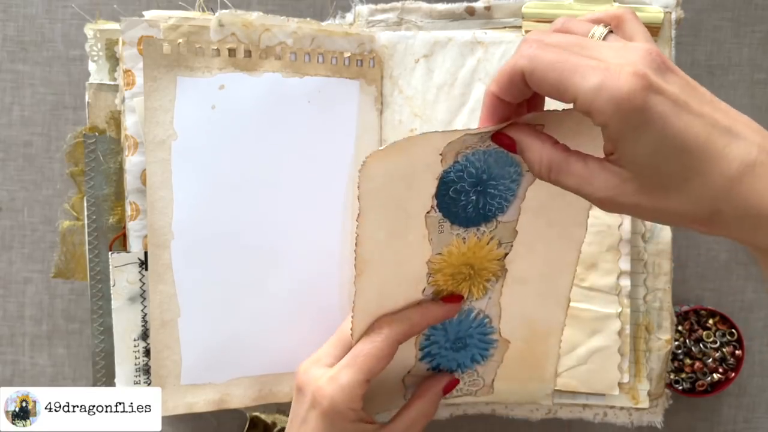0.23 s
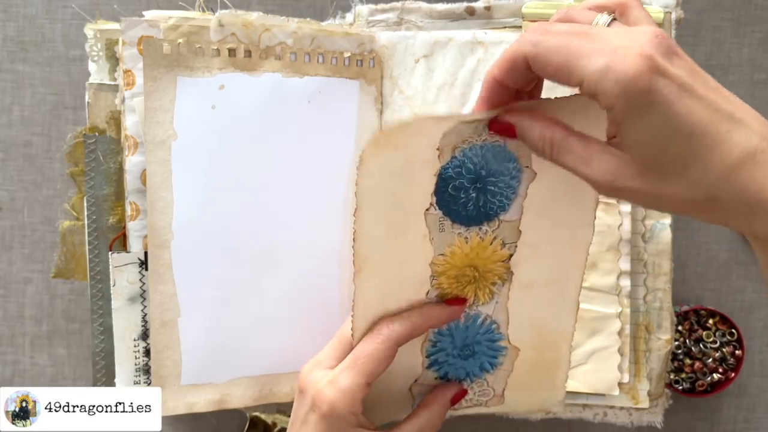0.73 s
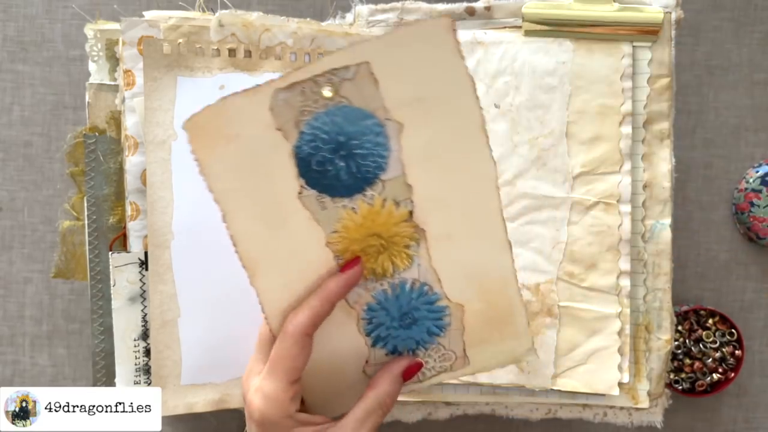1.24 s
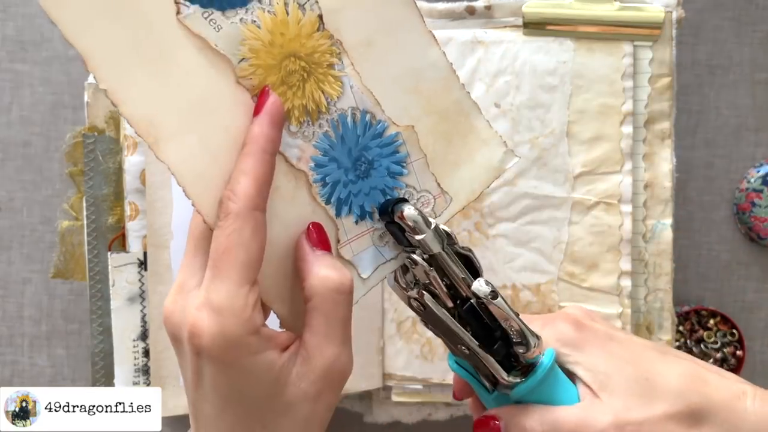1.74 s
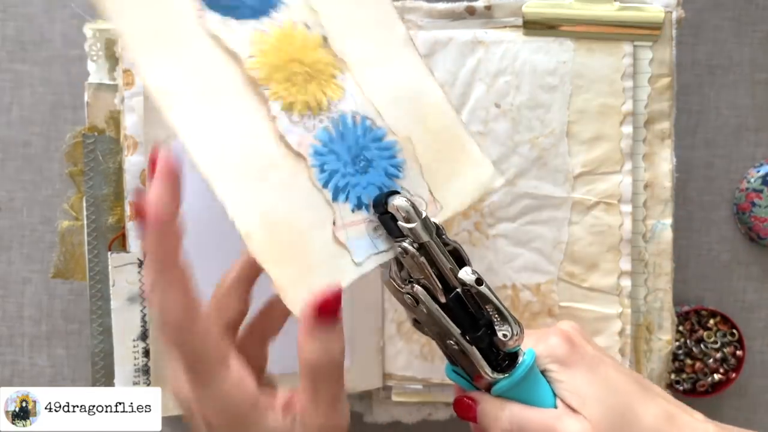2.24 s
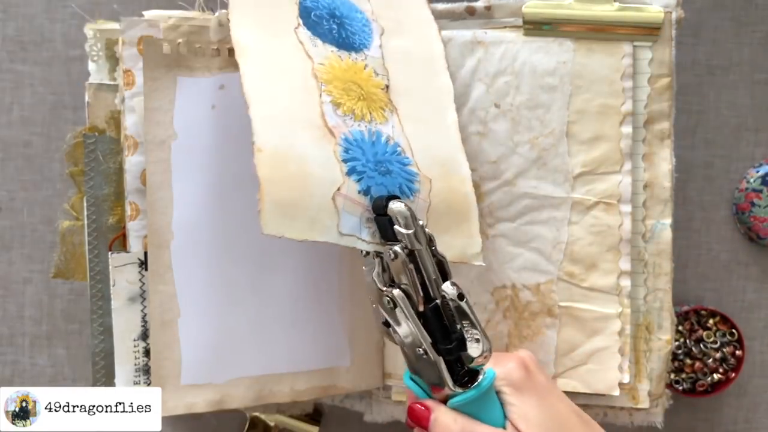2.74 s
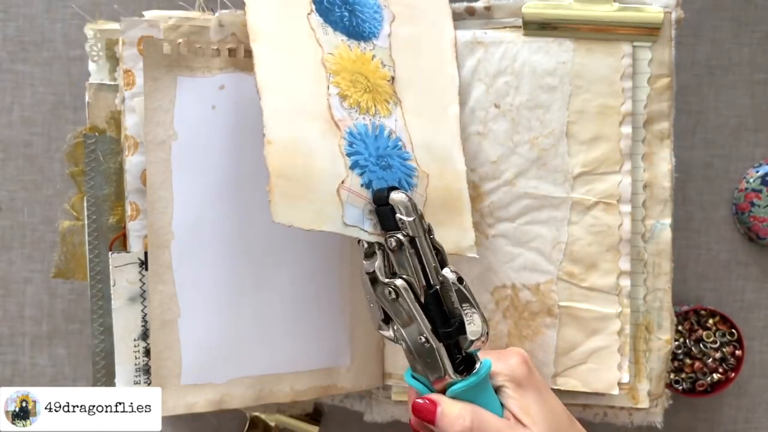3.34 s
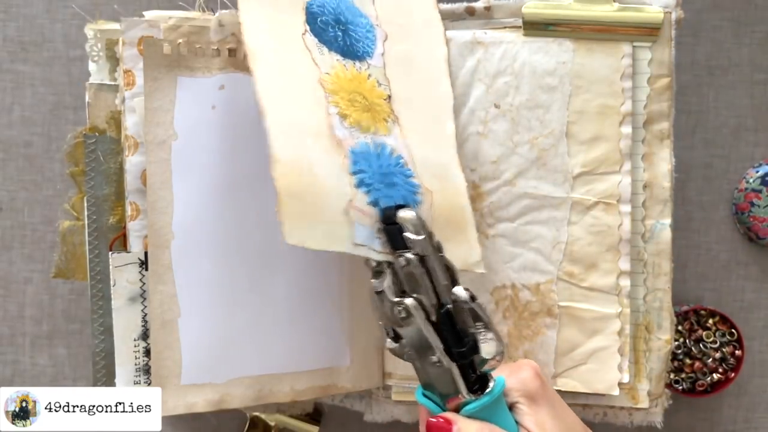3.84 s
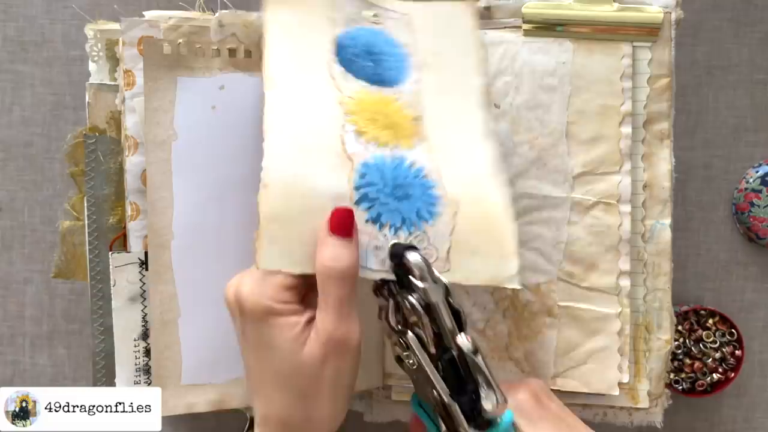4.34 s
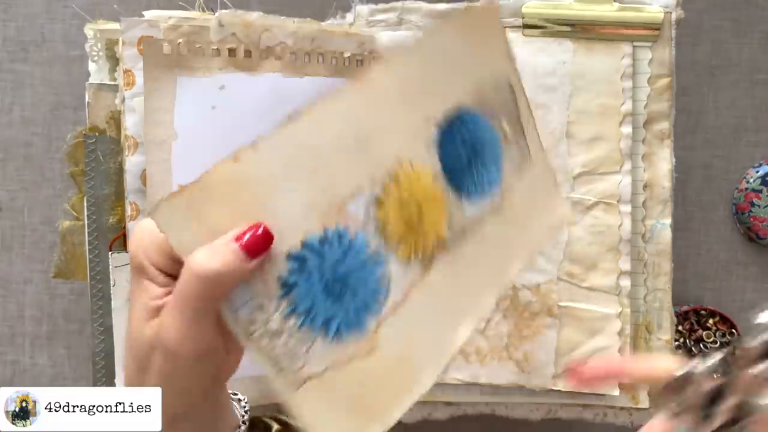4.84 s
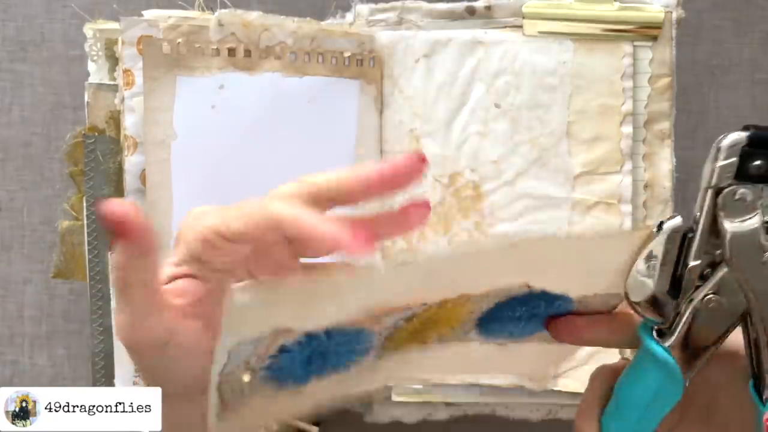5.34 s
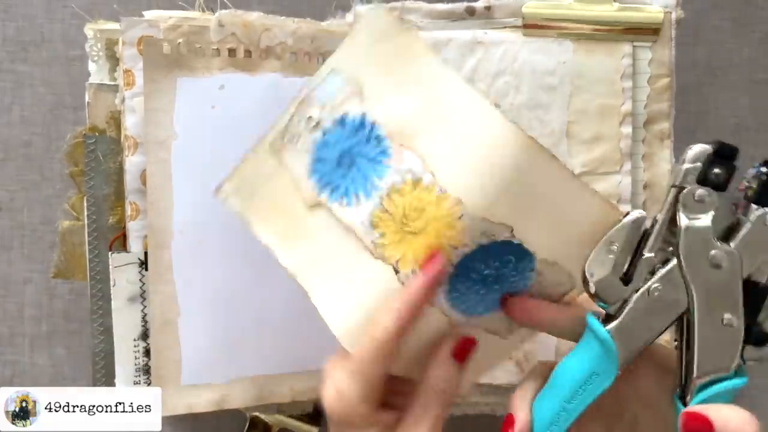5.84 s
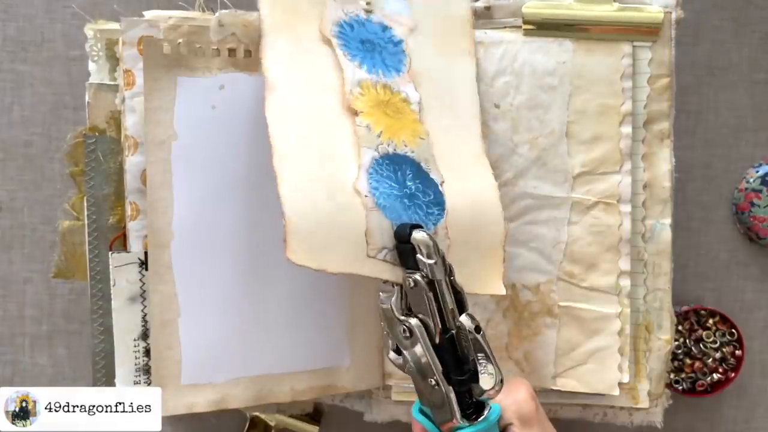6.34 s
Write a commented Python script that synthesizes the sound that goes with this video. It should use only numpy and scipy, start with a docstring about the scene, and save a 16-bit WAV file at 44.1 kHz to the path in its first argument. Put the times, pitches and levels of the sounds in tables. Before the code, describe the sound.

A quiet, fairly dry indoor room with very faint steady hiss and a wavering low rumble; everything is close, in stereo. From 0 to 0.8 s stiff paper rubs softly and buckles with dull, hollow pops around 0.26, 0.36 and 0.7 s. It nearly quiets, with one muted flex at 1.35 s. From 1.9 to 2.45 s come crisp crackles and light scraping, then faint rubbing. Pliers tick lightly at 2.95 s, clack firmly at 3.2 s with a short low ring, tick again from 3.5 to 3.75 s, and crimp with a hard snap at 3.86 s. Around 4.2 to 4.38 s they spring open, the loudest clack, mixed with sharp paper snaps and a burst of rustle. Rubbing and small crackles continue. Dense paper snaps peak at 5.25 to 5.35 s and again at 5.75 to 5.95 s, leaving brief papery resonance. The sound thins out to a small brush and flick near 6.59 s.

```python
"""Under the whole scene in a quiet room lie a steady hiss (shaped noise) and a wavering low rumble (a resonance).
A stiff paper sheet is first rubbed and buckled close to a two-port microphone: noise strokes and ringing snaps.
Then steel hand pliers close on it with a few clicks, crimp, and spring open: noisy pushes ring the tool.
Harder snaps and rubbing of the sheet follow and thin out; narrow-band hums of pliers and sheet follow some blows."""
import sys
import numpy as np
from scipy import signal
from scipy.fft import rfft, irfft, next_fast_len
from scipy.io import wavfile
from scipy.ndimage import uniform_filter1d, map_coordinates

SR = 44100
rng = np.random.default_rng(int(sys.argv[2]) if len(sys.argv) > 2 else 0)


def wav_out(sig):
    """Save sig, one row per channel (or a flat mono array), as 16-bit PCM at SR to the path in sys.argv[1]."""
    wavfile.write(sys.argv[1], SR, np.round(np.clip(np.atleast_2d(sig).T, -1, 1) * 32767).astype(np.int16))


N = 291362

# Spectrum of the steady hiss. Each row: frequency in Hz, relative density in dB per Hz.
HISS_SPECTRUM = [(80, -18), (120, -13), (250, -14), (500, -20), (1000, -21), (4000, -33), (12000, -31)]
HISS_DB = -68
# Course of the low rumble. Each row: time in seconds, level in dB.
RUMBLE_LEVEL = [(0.0, -65), (0.27, -61.5), (0.42, -71), (1.67, -65), (1.78, -71.5), (2.28, -55),
                (2.54, -66), (3.85, -63.5), (4.06, -55.5), (4.21, -62), (4.42, -50), (4.75, -77),
                (5.19, -77), (5.34, -63), (5.65, -73), (5.8, -58.5), (6.61, -79)]

# Phase between the ports. Each row: frequency in Hz, lead of the left port in radians.
PORT_LEAD = [(0, 0), (2000, .2), (2600, 1.4), (3500, 1.3), (4100, .6), (5500, .2), (7200, 1.3), (8500, 0),
             (10250, -3.14), (12000, -6.3), (13750, -9.4), (16000, -13.5)]
# Strength between the ports. Each row: frequency in Hz, left minus right in dB.
PORT_BALANCE = [(60, 1.5), (200, 0.7), (700, 1.3), (1400, -0.5), (3000, 3), (6000, 2), (10000, -0.1)]
# Decay of the room. Each row: frequency in Hz, time to fall by 60 dB in seconds.
WALL_DECAY = [(200, 0.21), (1500, 0.14), (10000, 0.15)]
# Part of the echoes with opposite sign at the ports. Each row: frequency in Hz, gain in dB.
ECHO_SCATTER = [(200, -18.5), (700, -14.5), (2500, -15.5), (5500, -5), (10000, -21)]
# Response of the microphone. Each row: frequency in Hz, gain in dB.
MICROPHONE_RESPONSE = [(100, -0.5), (12500, -2.5), (13300, -3.5), (16000, -9)]
TOP_HZ = 16300  # band limit of the microphone
SOFT_TOP_HZ = 13000  # the hiss and the rubbing are kept below this frequency

# Arrival delays of flap, crack and tick in seconds: bending waves are slower at low pitch.
ARRIVAL_LAG_S = [.001, .0005, 0]
# Contacts in the pliers, which ring jaws and handles. Each row: start in seconds, crack level in dB
# before a common gain, knock and tick in dB over the crack, knock and crack pitch in Hz.
PLIER_CLICKS = [(2.9406, -44.5, -32, -7, 1320, 2950), (2.9532, -38, -22, -3, 1070, 2960),
                (3.1997, -23, 4, 1, 659, 2200), (3.2042, -20, -1.5, -6.5, 590, 2730),
                (3.3966, -51, -23, 9.5, 595, 2370), (3.5051, -32, -1, 3, 846, 3160),
                (3.5983, -33, 0.5, 5, 1640, 3030), (3.7206, -59, -8, 14, 570, 3060),
                (3.753, -43, -0.5, 26.5, 1220, 4830), (3.777, -50, -2, -4.5, 620, 2620),
                (3.8471, -35.5, -13, 11, 1330, 2640), (3.8554, -16.5, -8.5, 3, 1450, 2900),
                (4.2187, -39.5, 3, -11.5, 1070, 2720), (4.2413, -27.5, 0, 7, 1490, 2340),
                (4.3019, -14, -2, -1, 930, 3180)]
# Resonances of the jaws, damped by the hand. Each row: centre in Hz, width in Hz, relative level in dB.
JAW_MODES = [(5860, 1800, -4.5), (8400, 1770, 0), (10870, 1740, 2), (14800, 1500, -13.5)]
# Resonances of the tool after a blow. Each row: centre in Hz, width in Hz, relative level in dB.
HANDLE_MODES = [(312.6, 45, -3), (610, 190, -0.5), (1430, 75, -7.5), (2900, 350, 1)]

# Lingering hums of pliers and sheet after some blows. Each row: start in seconds, hold in seconds,
# fall in seconds (by 20 dB), level in dB, pitch in Hz.
LINGERING_HUMS = [(3.216, 0.08, 0.07, -50, 309), (3.87, 0.038, 0.076, -51, 1380),
                  (5.296, 0.039, 0.081, -45, 883), (5.957, 0.024, 0.18, -58, 880)]
# Broad resonances of the sheet in four ranges: thud, flutter, scrape, hiss.
# Each row within a range: centre in Hz, width in Hz, relative level in dB.
SHEET_MODES = [
    [(102.8, 57, 0.5), (221, 84, 1.5), (342, 180, 0)],
    [(446, 270, -1.5), (867, 295, 3.5), (1277, 1040, -1)],
    [(1940, 1840, 0.5), (2970, 1190, 6.5), (4410, 3370, -0.5)],
    [(6300, 3120, -4), (9050, 2410, 0), (11020, 1540, 0)],
]
# Buckles of the sheet. Each row: start in seconds, crack level in dB before a common gain,
# flap and tick in dB over the crack, flap and crack pitch in Hz.
BUCKLES = [(0.0966, -48, 10, -23, 1000, 1860), (0.2615, -28, 0, -24, 870, 1650),
           (0.3082, -58, 16, -19, 970, 1670), (0.3566, -24.5, -4.5, -14.5, 1000, 1710),
           (0.442, -45, 0, 9, 764, 2440), (0.474, -57, 10.5, 9, 1040, 1580),
           (0.7001, -28, 0, -33, 1040, 1610), (1.3515, -38, -7, -11, 420, 1530),
           (1.8582, -54, -12, -21, 325, 3020), (1.9361, -37.5, -10, 3, 974, 1500),
           (1.9445, -33, -3, -3, 860, 4150), (1.954, -34, -1.5, 5.5, 910, 3200),
           (1.964, -44, 1, -13.5, 400, 1610), (2.13, -48, 3, -8, 410, 3950),
           (2.1852, -42.5, -3, -3, 315, 4500), (2.227, -43.5, 7.5, -10, 910, 3990),
           (2.2414, -35, 1, 0.5, 390, 2660), (2.3127, -31.5, 5, -17, 970, 2720),
           (2.3493, -31, -3, -21, 974, 3000), (2.3577, -34, -4, -8, 364, 3120),
           (2.378, -32, 7, 7.5, 1020, 4180), (2.4151, -43, 2, 20, 1020, 4240),
           (2.4564, -44, -20, -2, 904, 3700), (2.626, -47.5, -35, -16, 398, 3560),
           (4.1168, -45.5, 11, 4, 1040, 1440), (4.3105, -24.5, -24, 3, 1020, 3520),
           (4.3202, -15.5, -13, -1.5, 466, 3240), (4.335, -37, 5, 17, 1070, 2140),
           (4.3524, -22.5, -11, -17, 885, 2800), (4.3774, -29.5, -26.5, -1, 980, 2800),
           (4.4958, -41.5, 2, 6, 470, 4440), (4.5684, -33, -0.5, 4.5, 860, 3430),
           (4.6771, -34, -7.5, -19.5, 1020, 4000), (4.922, -39.5, 4, -9, 815, 1770),
           (5.0924, -48, -13, -27.5, 975, 2820), (5.157, -54.5, -3, -12, 890, 2713),
           (5.2535, -30.5, -3.5, 1, 1040, 3900), (5.2795, -19, -9.5, -7.5, 1500, 2620),
           (5.2916, -29, -3.5, -14.5, 820, 1880), (5.305, -25.5, -11, 4, 855, 3240),
           (5.3166, -36.5, 4, 0, 880, 2600), (5.3309, -25, -6, -13, 920, 2160),
           (5.346, -41.5, 9.5, -8, 880, 2050), (5.3658, -50.5, 14, -14, 870, 2210),
           (5.503, -39, -7, 11.5, 1520, 3400), (5.514, -27, -6, -36, 884, 2060),
           (5.5944, -29.5, -10, -23, 690, 2140), (5.6019, -38.5, 8.5, 5.5, 870, 1740),
           (5.6557, -48.5, 1, -22, 1210, 2230), (5.7629, -26.5, -2, -7, 1180, 2620),
           (5.7987, -25, -0.5, -33, 1360, 2660), (5.8075, -29, 4.5, -17.5, 835, 2330),
           (5.8137, -25.5, -9.5, -22, 790, 3800), (5.8307, -35, 0, -18, 970, 2190),
           (5.877, -26, -12.5, 3.5, 776, 4850), (5.9317, -40.5, 5.5, 11, 940, 2180),
           (5.9497, -37, 4.5, -22, 940, 1490), (6.59, -39, -13, 1, 1450, 2920)]
# Strokes of fingers and sheet. Each row: start of the hold, hold, rise and fall in seconds (rise and fall
# span 20 dB), scrape level in dB, flutter and hiss in dB over the scrape.
RUB_STROKES = [(0.0, 0.0085, .05, 0.29, -48.5, -4.5, -3.5), (0.154, 0.016, 0.032, 0.085, -59.5, 6, 1),
               (0.35, 0.0091, 0.052, 0.11, -56.5, 5.5, -2), (0.495, 0.019, 0.13, 0.05, -59.5, -3.5, 1.5),
               (0.669, 0.039, .03, .05, -64, 6.5, -2), (0.728, 0.023, 0.018, .06, -45.5, -6.5, 3.5),
               (0.835, 0.09, .08, 0.13, -60, -2, 4), (1.049, 0.02, .06, 0.19, -64.5, -0.5, 0.5),
               (1.359, 0.039, 0.08, 0.01, -60, 1, 4), (1.943, 0.021, 0.023, 0.072, -53.5, 1.5, -4),
               (2.126, 0.056, 0.074, 0.13, -55, -0.5, 7.5), (2.347, 0.009, 0.07, 0.046, -50, 7.5, -9),
               (2.368, .01, 0.017, 0.13, -42.5, -3.5, 4.5), (2.704, 0.011, 0.16, .02, -60, -22, -20),
               (2.798, 0.024, 0.056, 0.11, -50, -9.5, -2), (2.961, 0.0092, 0.07, 0.056, -71, 1, 8),
               (3.126, 0.03, .15, 0.093, -51.5, -16, -7), (3.263, 0.0091, 0.25, 0.14, -54, 3, 1.5),
               (3.409, 0.054, 0.018, 0.024, -55, -9, -1), (3.545, .01, 0.071, .055, -55.5, -3, 0.5),
               (3.664, .01, .18, 0.094, -57, -7, 1.3), (3.863, .01, 0.09, 0.16, -44.5, -17.5, -2.5),
               (3.96, 0.011, 0.067, 0.057, -53.5, -4.5, -2), (4.083, 0.0092, 0.052, 0.087, -46, -5.5, -4),
               (4.331, .01, 0.062, 0.16, -33.5, -2, 1), (4.51, 0.13, 0.038, 0.13, -51.5, -12, -3.5),
               (4.684, 0.055, 0.045, .22, -43.5, -16, -1), (5.01, 0.0093, 0.055, 0.03, -58.5, -18, -15),
               (5.095, 0.0067, 0.021, 0.058, -62.5, -26, -5), (5.246, 0.054, 0.073, .05, -43.5, -13, -2),
               (5.277, 0.018, 0.028, 0.058, -36, -5, -0.5), (5.322, 0.049, 0.07, 0.18, -54, -1.5, -1),
               (5.523, 0.14, 0.034, .05, -64.5, -1.5, 5.5), (5.715, .22, 0.024, 0.037, -47.5, -1, 4),
               (5.993, 0.041, 0.047, 0.1, -50.5, -8, -0.5), (6.341, 0.0081, 0.015, 0.15, -51.5, -23.5, 1),
               (6.55, 0.011, .02, 0.032, -59, -12, 4.5), (6.587, .03, .015, .05, -43.5, -11.5, 3)]
# The sheet bumps a hand or the table. Each row: time in seconds, level in dB.
SHEET_BUMPS = [(0.369, -60.5), (0.71, -54), (0.94, -67), (1.36, -60), (1.966, -51.5), (2.163, -51),
               (2.38, -50), (3.24, -50), (4.093, -71), (4.333, -48.5), (5.288, -58), (5.525, -59),
               (5.797, -48)]
BUMP_RISE_S, BUMP_FALL_S = 0.098, 0.1  # each spans 20 dB
# Force with the hands still, in dB: thud relative to the rumble, then flutter, scrape and hiss.
STILL_HANDS_DB = [-6, -79.5, -79.5, -75.5]


def amp(db):
    """Level law: 20 dB are a factor of ten in amplitude."""
    return 10 ** (np.asarray(db) / 20)


def unit(x):
    """Normalisation to an rms of one."""
    return x / np.sqrt(np.mean(np.abs(x) ** 2) + 1e-20)


def peaked(x):
    """Normalisation to a peak of one."""
    return x / np.abs(x).max()


def along(points, hz):
    """Interpolation of (Hz, value) points on a logarithmic frequency axis."""
    f, v = np.transpose(points)
    return np.interp(np.log(hz + 1), np.log(f + 1), v)


def curves(rows):
    """Linear interpolation in time: one value per sample for each column after the time."""
    s, *columns = np.transpose(rows)
    return np.array([np.interp(np.arange(N) / SR, s, column) for column in columns])


def wobble(rate):
    """Slow random modulation: a smooth curve through `rate` random knots a second."""
    knots = rng.standard_normal(int(N * rate / SR) + 4)
    return map_coordinates(knots, [np.arange(N) * rate / SR])


def filtered(x, response):
    """Linear filtering: the spectrum times a complex response of frequency."""
    m = next_fast_len(N + SR // 2)
    spectrum = rfft(x, m) * response(np.fft.rfftfreq(m, 1 / SR))
    return irfft(spectrum, m)[..., :N]


def resonances(modes):
    """Modal superposition: a steep-sided causal response that keeps the level of white noise."""
    def response(f):
        total = 0
        for k, (centre, width, db) in enumerate(modes):
            mode = 1j * f * width / (centre * centre - f * f + 1j * f * width)
            total = total + (-1) ** k * amp(db) * mode  # neighbouring modes alternate in sign
        return unit(total ** 2)  # squaring steepens the sides
    return response


def ports(x):
    """Phase and level differences: the two ports hear a near source with unlike phase and strength."""
    f, lead = np.transpose(PORT_LEAD)
    side = np.array([[.5], [-.5]])  # left, right

    def response(hz):
        gain = amp(side * along(PORT_BALANCE, hz))
        return gain * np.exp(1j * side * np.interp(hz, f, lead))
    return filtered(x, response)


def room_noise():
    """Partial coherence: steady hiss, partly unlike at the ports, and a resonant, wavering low rumble."""
    common, left, right = rng.standard_normal((3, N))

    def alike(hz):  # amplitude of the common part over the separate parts
        return along([(100, 2.55), (300, 0.91), (700, 0.46), (8000, .5)], hz)

    def spectrum(hz):
        return amp(along(HISS_SPECTRUM, hz)) * (hz > 70) * (hz < SOFT_TOP_HZ)

    pair = ports(filtered(common, alike)) + [left, right]
    hiss = unit(filtered(pair, spectrum))
    both, apart = filtered(rng.standard_normal((2, N)), resonances([(52.4, 18, 0)]))
    rumble = unit(both) + amp(-15.5) * unit(apart) * np.array([[1], [-1]])
    return amp(HISS_DB) * hiss + amp(curves(RUMBLE_LEVEL)[0]) * rumble


def walls(x):
    """Reverberation: in two independent noise tails each frequency dies at its own speed."""
    hz, t, z = signal.stft(rng.standard_normal((2, SR // 2)), SR, nperseg=256)
    decay = amp(-60 * t / along(WALL_DECAY, hz)[:, None])
    tails = signal.istft(z * decay, SR, nperseg=256)[1]
    delayed = np.pad(x, (150, 0))[None]  # 150 samples
    return signal.fftconvolve(delayed, tails / np.linalg.norm(tails[0]), axes=1)[:, :N]


def panel(push, hz, sharpness, ring):
    """Forced and free vibration: a panel passes a broad band around its pitch and rings at the pitch."""
    spread = 1 + 1 / sharpness
    band = signal.butter(2, [hz / spread, hz * spread], "band", fs=SR, output="sos")
    broad = signal.sosfilt(band, push)
    ringing = signal.lfilter(*signal.iirpeak(hz, 4 * sharpness, SR), broad)
    return peaked(broad + ring * ringing)


def bursts(events, t60, sharpness, ring, rise_s, gain_db, thud_db):
    """Impact excitation: noisy pushes ring a panel at two pitches; rows are sound, treble and thud force."""
    out, t = np.zeros((3, N + SR)), np.arange(SR // 8) / SR
    envelope = (1 - np.exp(-t / rise_s)) * amp(-60 * t / t60)
    for s, db, low_db, high_db, low_hz, mid_hz in events:
        push = envelope * rng.standard_normal((3, len(t)))
        flap = panel(push[0], low_hz, sharpness, ring)
        crack = panel(push[1], mid_hz, sharpness, ring)
        flap_at, crack_at, tick_at = (round((s + lag) * SR) for lag in ARRIVAL_LAG_S)
        out[0, flap_at:flap_at + len(t)] += amp(db + low_db + gain_db) * flap
        out[0, crack_at:crack_at + len(t)] += amp(db + gain_db) * crack
        out[1, tick_at:tick_at + len(t)] += amp(db + high_db + gain_db) * peaked(push[2])
        out[2, flap_at] += amp(db + low_db + thud_db)  # a single impulse
    return out[:, :N]


def pliers():
    """Impact of solids: jaws, dies and spring knock against each other and ring the tool."""
    knock, tick, thud = bursts(PLIER_CLICKS, t60=0.013, sharpness=1.57, ring=2.0, rise_s=0.00065,
                               gain_db=1.5, thud_db=10.5)
    jaws = filtered(tick, resonances(JAW_MODES))
    handles = filtered(thud, resonances(HANDLE_MODES))
    return knock + jaws + handles


def swells(at_s, hold_s, rise_s, fall_s, db):
    """Addition of powers: events rise, hold and fall in straight dB lines; db has a row per layer."""
    def column(v):
        return np.maximum(np.reshape(v, (-1, 1)), .002)  # no time is shorter than 2 ms

    t = np.arange(0, N, 64) / SR - np.reshape(at_s, (-1, 1))  # one step per 64 samples
    slope = np.minimum(t / column(rise_s), (column(hold_s) - t) / column(fall_s))
    shape = amp(2 * 20 * np.minimum(0, slope))  # doubled dB turn amplitude into power
    return np.repeat(amp(2 * np.atleast_2d(db)) @ shape, 64, axis=1)[:, :N]


def hums():
    """Narrow-band resonance: noise through one mode gives wavering tones that swell quickly and linger."""
    total = 0
    for s, hold_s, fall_s, db, hz in LINGERING_HUMS:
        level = np.sqrt(swells([s], hold_s, .015, fall_s, [db])[0])
        tone = filtered(rng.standard_normal(N), resonances([(hz, 0.14 * hz, 0)]))
        total = total + level * tone
    return total


def handling():
    """Driving force: how hard the hands drive the four ranges of the sheet, summed as powers."""
    s, hold_s, rise_s, fall_s, db, flutter_db, hiss_db = np.transpose(RUB_STROKES)
    bump_s, bump_db = np.transpose(SHEET_BUMPS)
    bumping = swells(bump_s, 0, BUMP_RISE_S, BUMP_FALL_S, bump_db)
    rubbing = swells(s, hold_s, rise_s, fall_s, [db + flutter_db, db, db + hiss_db])
    resting_db = np.reshape(STILL_HANDS_DB, (-1, 1)) + curves(RUMBLE_LEVEL) * [[1], [0], [0], [0]]
    return np.sqrt(np.vstack([bumping, rubbing]) + amp(2 * resting_db))


def paper():
    """Stick-slip and buckling: fibres catch and slip in clumps and crackle; buckles snap over them."""
    catch_db = 2.36 * wobble(35) + 2.0 * wobble(300)
    sparks = (rng.random(N) < 120 / SR) * amp(2.7 * rng.standard_normal(N))  # about 120 a second
    spark_decay = amp(-60 * np.arange(SR // 50) / SR / 0.004)  # 60 dB in 4 ms
    crackle = 1 + 0.59 * np.convolve(sparks, spark_decay)[:N]
    grain = [unit(crackle * amp(catch_db + 2.3 * wobble(50)) * rng.standard_normal(N))
             for _ in SHEET_MODES]

    # the grip keeps shifting the colour: random patches smoothed over frequency, then time
    hz, _, z = signal.stft(handling() * grain, SR, nperseg=256)
    patches = uniform_filter1d(rng.standard_normal(z.shape[1:]), 4, 0)
    patches = uniform_filter1d(patches, 12, 1)
    colour = unit(amp(2.2 * unit(patches))) * (hz < SOFT_TOP_HZ)[:, None]
    force = signal.istft(z * colour, nperseg=256)[1][:, :N]

    snaps, tick, thud = bursts(BUCKLES, t60=0.028, sharpness=1.46, ring=3.64, rise_s=0.0005,
                               gain_db=2.0, thud_db=6.5)
    force = force + [thud, 0 * thud, 0 * thud, tick]
    return snaps + sum(filtered(row, resonances(modes)) for row, modes in zip(force, SHEET_MODES))


def scene():
    """Superposition: direct sound, echoes alike and unlike at the ports, and room noise add up."""
    near = paper() + pliers() + hums()
    echo, unlike_echo = walls(near)
    heard = ports(near + amp(-13) * echo)
    scatter = filtered(unlike_echo, lambda hz: amp(along(ECHO_SCATTER, hz)))
    return heard + scatter * np.array([[1], [-1]]) + room_noise()


def record(dry):
    """Band limitation: the microphone fades in the top octave and keeps nothing above its limit."""
    return filtered(dry, lambda hz: amp(along(MICROPHONE_RESPONSE, hz)) * (hz < TOP_HZ))


dry = scene()
out = record(dry)
wav_out(out)
```